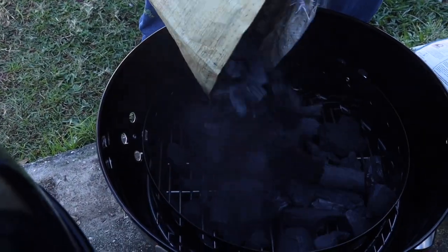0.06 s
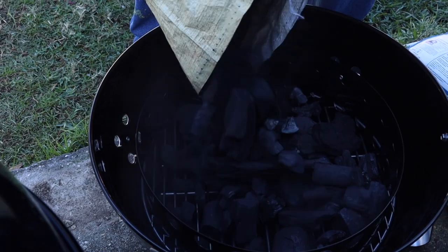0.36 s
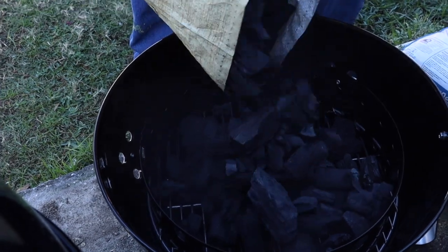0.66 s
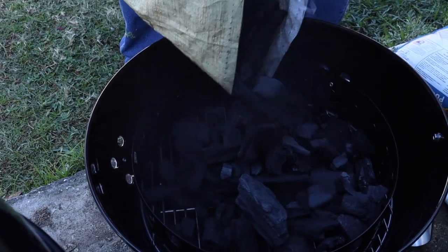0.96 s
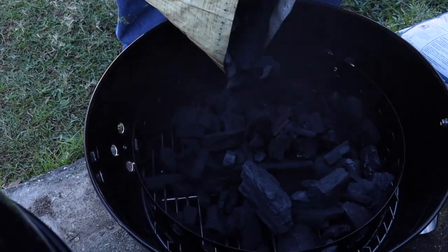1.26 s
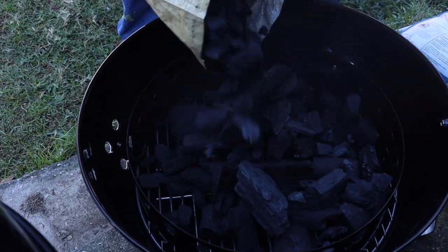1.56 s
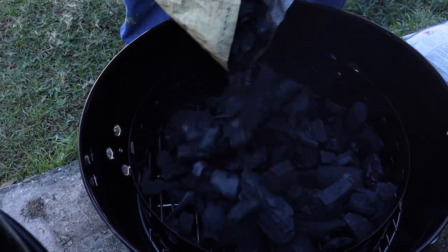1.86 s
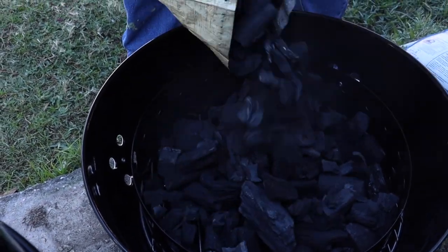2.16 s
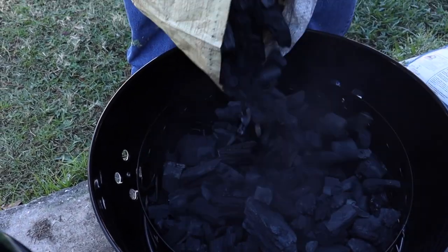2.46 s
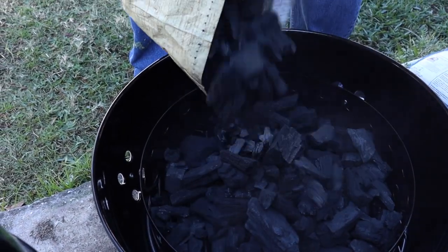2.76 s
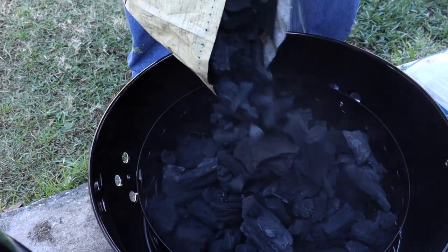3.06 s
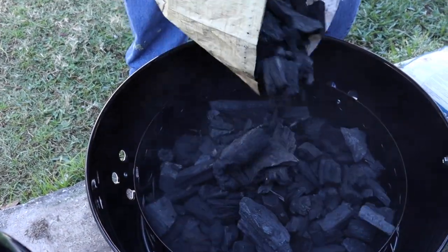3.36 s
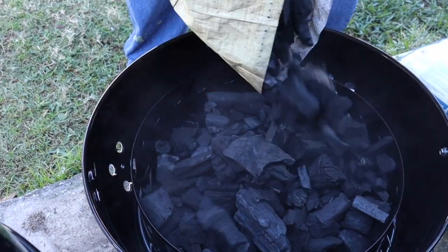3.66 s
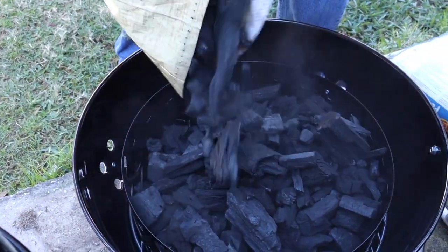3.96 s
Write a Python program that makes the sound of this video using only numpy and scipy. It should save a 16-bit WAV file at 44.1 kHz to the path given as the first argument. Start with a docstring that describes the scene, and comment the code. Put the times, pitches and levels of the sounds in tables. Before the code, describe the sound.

Lump charcoal pours from a paper bag into a metal grill, clinking and clattering.

```python
"""Lump charcoal, shaken from a paper bag into a steel smoker bowl, outdoors.
Big lumps ring in a few modes and bounce; smaller ones clatter in clusters.
Splinters snap, grit tinkles, hard contacts crack. The bowl adds short echoes and a metallic ring.
The bag crumples and thumps as the load shifts, over faint open-air noise."""
import sys
import numpy as np
from scipy import signal
from scipy.fft import rfft, irfft, next_fast_len
from scipy.io import wavfile
from scipy.ndimage import uniform_filter1d, map_coordinates

SR = 44100
rng = np.random.default_rng(int(sys.argv[2]) if len(sys.argv) > 2 else 0)


def generate_wav(signal):
    """Clip the signal to [-1, 1] and save it as 16-bit WAV at the path in sys.argv[1]."""
    frames = np.transpose(np.atleast_2d(signal))
    scaled = np.clip(frames, -1, 1) * 32767
    pcm = np.round(scaled).astype(np.int16)
    wavfile.write(sys.argv[1], SR, pcm)


N = 4 * SR
CONTACT_S = 0.00029

# Lump landings: t/s, level/dB, f/Hz, T60/s
LANDINGS = [(0, -19, 2320, 0.065), (0.087, -35, 2460, 0.19), (0.109, -14.5, 3090, 0.023),
            (0.183, -29, 2406, 0.14), (0.294, -23, 1020, 0.035), (0.3316, -6, 3069, 0.061),
            (0.35, -16.5, 3810, 0.041), (0.4289, -1.5, 3127, 0.023), (0.4533, 2.5, 3040, 0.021),
            (0.477, -7.5, 3240, 0.017), (0.518, -22.5, 4560, 0.018), (1.2225, -11.5, 2404, 0.027),
            (1.23, -16.5, 2438, 0.079), (1.264, -15.5, 3070, 0.027), (1.303, -15, 3030, 0.02),
            (1.473, -20, 2530, 0.035), (1.485, -12.5, 2620, 0.027), (1.512, -20, 2375, 0.06),
            (1.559, -17, 2420, 0.033), (1.625, -18.5, 4060, 0.068), (1.6578, -18, 2893, 0.065),
            (1.663, -16.5, 3485, 0.034), (1.87, -16, 2990, 0.028), (1.9078, -18, 2477, 0.16),
            (2.182, -11.5, 3110, 0.037), (2.2468, 0, 2300, 0.0096), (2.257, -7.5, 3180, 0.03),
            (2.3238, -9.5, 3040, 0.029), (2.4733, -13, 2992, 0.047), (2.5225, -13, 3040, 0.033),
            (2.5895, -7, 2400, 0.033), (2.6359, -21, 3564, 0.37), (2.6727, -11, 2465, 0.036),
            (2.7048, -8.5, 2990, 0.023), (2.7375, -0.5, 3080, 0.013), (2.7447, -2, 3264, 0.014),
            (2.8944, -23.5, 5350, 0.022), (2.918, -2.5, 3062, 0.025), (3.02, -16, 3110, 0.075),
            (3.0465, -10, 2380, 0.043), (3.1147, -18, 2230, 0.017), (3.143, -5, 3000, 0.023),
            (3.5282, -19, 2440, 0.055), (3.719, -17.5, 2545, 0.037), (3.765, -22, 2500, 0.041),
            (3.8046, -12, 2850, 0.015), (3.8764, -18, 3200, 0.036)]
# Lump modes: frequency ratio, level/dB
LUMP_MODES = [(1, 3.5), (1.09, -7), (1.2, -15), (1.62, -28), (3.55, -32.5)]


def clinks(level_db=1.12, attack_s=0.0015, detune=0.04, contacts=6, bounce_s=0.0083, loss_db=12):
    """Big lumps ring on landing and skitter on in ever weaker bounces."""
    out, t = np.zeros(N), np.arange(SR // 10) / SR
    attack = 1 - np.exp(-(t / attack_s) ** 2)
    for start_s, db, hz, t60_s in LANDINGS:
        for bounce, jitter in enumerate(rng.standard_normal((contacts, len(LUMP_MODES) + 1))):
            ring = np.zeros(len(t))
            for mode, (ratio, mode_db) in enumerate(LUMP_MODES):
                tuning = 1 + detune * jitter[mode] if mode or bounce else 1
                ring += amp(mode_db - 60 * t / t60_s) * np.sin(2 * np.pi * hz * ratio * tuning * t)
            delay_s = bounce_s * bounce * np.exp(0.22 * jitter[-1])
            gain = amp(db + level_db - loss_db * np.sqrt(bounce))
            add(out, start_s + delay_s, gain * ring * attack)
    return out


# Clusters rolling down the heap: centre t/s, level/dB, half-width/s
CLUSTERS = [(.1, -36, 0.24), (.935, -29.5, 0.017), (1.338, -19.5, 0.0099), (1.52, -25, 0.054),
            (1.605, -27, 0.025), (1.7, -30, 0.065), (1.88, -18.5, 0.023), (1.925, -16.5, 0.029),
            (1.975, -17.5, 0.0084), (2.075, -27.5, 0.041), (2.164, -21, 0.021), (2.21, -21, 0.074),
            (2.28, -35, 0.015), (2.41, -28.5, 0.046), (2.51, -27.5, 0.084), (2.61, -18, 0.017),
            (2.662, -10.5, 0.019), (3.06, -26, 0.039), (3.16, -16.5, 0.023), (3.225, -20, .016),
            (3.28, -29, 0.045), (3.425, -27, 0.024), (3.54, -21, 0.013), (3.73, -27, 0.052),
            (3.795, -27.5, 0.017), (3.91, -32, 0.055)]


def tumbles(level_db=-3.5, crunch_db=-11, scrape_db=-43.5):
    """Mid-size lumps clatter and crunch together in clusters, over a soft steady scrape."""
    clatter = pieces(band_hz=(1950, 4200), t60_s=0.028, scatter_db=3.5, count=3000, centring=2)
    crunch = pieces(band_hz=(3400, 6800), t60_s=0.018, scatter_db=4, count=3000)
    scrape = pieces(band_hz=(1700, 4600), t60_s=0.01, scatter_db=1.5, count=6000, centring=2)
    rolling = even(unit(clatter) + amp(crunch_db) * unit(crunch), span_s=0.12)
    return amp(level_db) * rolling * surges(CLUSTERS, floor_db=-45.5) + amp(scrape_db) * unit(scrape)


# Chip sprays: centre t/s, level/dB, half-width/s
CHIP_SPRAYS = [(.73, -54, 0.011), (1.105, -41.5, 0.01), (1.335, -44.5, 0.0077), (1.52, -47.5, 0.05),
               (1.615, -39, 0.014), (1.675, -37.5, 0.026), (1.915, -34.5, 0.022), (2.08, -42, 0.01),
               (2.175, -44, 0.047), (2.26, -45.5, 0.024), (2.43, -41, 0.053), (2.485, -38, 0.02),
               (2.57, -39.5, 0.046), (2.662, -32.5, 0.029), (3.145, -38, 0.015), (3.225, -36, 0.013),
               (3.27, -32.5, 0.0091), (3.535, -34.5, 0.013), (3.722, -38, 0.019), (3.8, -42.5, 0.025)]
# Grit spectrum: f/Hz, level/dB
GRIT_SPECTRUM = [(3000, 12), (7000, 3.5), (13000, -3), (16000, -19)]


def chips(splinter_db=0.5, grit_db=-3, clump_db=3.5):
    """Splinters ring glassily in each spray; dry grit tinkles on in clumps between sprays."""
    grit = pieces(band_hz=(3000, 16000), t60_s=0.007, scatter_db=4.5, count=2500, modes=3)
    grit = even(colour(grit, GRIT_SPECTRUM), span_s=0.05) * surges(CHIP_SPRAYS, floor_db=-48.5)
    splinters = pieces(band_hz=(5000, 14500), t60_s=0.024, scatter_db=4.2, count=1700, modes=4)
    splinters = even(splinters, span_s=0.04) * surges(CHIP_SPRAYS, floor_db=-64)
    clumps = amp(clump_db * wobble(knots_per_s=35.3))
    return amp(splinter_db) * splinters + amp(grit_db) * clumps * grit


# Splinter breaks: t/s, level/dB, centre f/Hz
BREAKS = [(0.426, -24.5, 10040), (.676, -41, 13900), (0.902, -36, 11300), (1.827, -22, 11700),
          (2.318, -28, 9500), (2.427, -19.5, 11500), (2.519, -19, 11000), (2.542, -20, 10800),
          (2.65, -17, 10500), (2.675, -23, 10500), (2.737, -16.5, 9500), (3.021, -25, 9800),
          (3.208, -20.5, 11500), (3.524, -22, 7800)]


def snaps(level_db=-10, t60_s=0.017, pitch_spread=0.32, scatter_s=0.013, fragments=14):
    """Brittle splinters shatter; fragments ring briefly at high, unrelated pitches."""
    out, t = np.zeros(N), np.arange(SR // 16) / SR
    attack = 1 - np.exp(-t / CONTACT_S)
    for start_s, db, centre_hz in BREAKS:
        envelope = attack * amp(db + level_db - 60 * t / t60_s)
        for pitch, lag, strength in rng.random((fragments, 3)):
            hz = centre_hz * np.exp(pitch_spread * (2 * pitch - 1))
            add(out, start_s + scatter_s * lag, (0.5 + strength) * envelope * np.sin(2 * np.pi * hz * t))
    return out


# Hard contacts: t/s, peak level/dB
HARD_CONTACTS = [(0.236, -21.5), (.666, -37), (1.096, -25.5), (1.1838, -18.5), (1.2062, -7), (1.598, -7),
                 (1.626, -7.5), (2.1533, -5.5), (2.189, -10), (2.2482, -12)]
# Crack spectrum: f/Hz, level/dB
CRACK_SPECTRUM = [(100, -13), (500, -0.5), (1600, 2), (4500, -3), (8000, -17), (15000, -35)]


def cracks(t60_s=0.043):
    """Hard contacts give dry, unpitched noise bursts."""
    out, t = np.zeros(N), np.arange(SR // 20) / SR
    for start_s, db in HARD_CONTACTS:
        burst = colour(rng.standard_normal(len(t)) * amp(-60 * t / t60_s), CRACK_SPECTRUM)
        add(out, start_s, amp(db) * burst / np.abs(burst).max())
    return out


# Bowl modes: f/Hz, level/dB
BOWL_MODES = [(2350, 5.5), (2473, 4.5), (2663, -26), (2835, -14), (3085, -2.5), (3490, 13)]
# Wall echo spectrum: f/Hz, level/dB
ECHO_SPECTRUM = [(5000, 1), (14000, -5.5)]


def bowl(coal, echo_db=-9, echo_t60_s=0.24, echo_rise_s=0.0009, ring_db=-24, ring_t60_s=0.34):
    """Steel walls add dense short echoes and ringing modes to the direct sound."""
    t = np.arange(SR // 2) / SR
    echo = colour(rng.standard_normal(len(t)), ECHO_SPECTRUM)
    echo *= amp(-60 * t / echo_t60_s) * (1 - np.exp(-t / echo_rise_s))
    ring = sum(amp(db) * np.sin(2 * np.pi * (hz * t + rng.random())) for hz, db in BOWL_MODES)
    ring *= amp(-60 * t / ring_t60_s)
    response = amp(echo_db) * echo / np.linalg.norm(echo) + amp(ring_db) * ring / np.linalg.norm(ring)
    return coal + signal.fftconvolve(coal, response)[:N]


# Bag crumples: centre t/s, level/dB, half-width/s
BAG_CRUMPLES = [(.2, -37, 0.023), (.365, -30, 0.043), (.42, -27.5, 0.016), (1.24, -32, 0.037),
                (1.31, -27, 0.011), (1.345, -35, 0.03), (1.58, -25.5, 0.033), (1.63, -30, 0.029),
                (1.73, -30.5, 0.022), (1.91, -27.5, 0.037), (2.08, -25, 0.021), (2.168, -23, 0.039),
                (2.315, -32, 0.036), (2.39, -23, 0.012), (2.46, -32.5, 0.099), (2.615, -25.5, 0.021),
                (2.985, -35, 0.025), (3.062, -28, 0.022), (3.283, -28, 0.021), (3.535, -32.5, 0.072),
                (3.71, -33.5, 0.066), (3.82, -33, 0.032), (3.915, -32, 0.055)]
# Paper spectrum: f/Hz, level/dB
PAPER_SPECTRUM = [(40, -65), (110, -2), (200, 2), (450, 6.5), (850, 3), (1300, 2), (1900, 6), (3000, -1.5),
                  (5000, -9.5), (8000, -24.5), (15000, -25.5)]


def bag(level_db=2, knock_db=-2):
    """Paper creases densely while lumps knock inside."""
    creases = colour(taps(scatter_db=3.2, count=10000), PAPER_SPECTRUM)
    knocks = pieces(band_hz=(640, 2000), t60_s=0.026, scatter_db=4.5, count=1100)
    crumple = even(unit(creases) + amp(knock_db) * unit(knocks), span_s=0.028)
    return amp(level_db) * crumple * surges(BAG_CRUMPLES, floor_db=-42)


# Load shifts: centre t/s, level/dB, half-width/s
LOAD_SHIFTS = [(.4, -38.5, 0.049), (.57, -32.5, 0.024), (.7, -34.5, 0.0065), (1.03, -36, 0.087),
               (1.33, -29, 0.028), (1.56, -28.5, 0.058), (1.73, -36, 0.066), (1.91, -37.5, 0.066),
               (2.18, -22, 0.042), (2.397, -24, 0.027), (2.615, -32.5, 0.049), (3.7, -32.5, 0.054),
               (3.85, -28.5, 0.075)]
# Thump spectrum: f/Hz, level/dB
THUMP_SPECTRUM = [(40, -20), (110, -14), (185, -1), (340, -0.5), (1200, -29), (5000, -103)]


def thumps(level_db=-1, hollow_db=-2):
    """The whole load shifts in the bag with dull, hollow thumps."""
    hollow = pieces(band_hz=(145, 330), t60_s=0.11, scatter_db=2, count=250, centring=2)
    hollow = colour(hollow, THUMP_SPECTRUM)
    thuds = colour(taps(scatter_db=1, count=900), THUMP_SPECTRUM)
    load = even(unit(thuds) + amp(hollow_db) * unit(hollow), span_s=0.073)
    return amp(level_db) * load * surges(LOAD_SHIFTS, floor_db=-46)


# Outdoor background spectrum: f/Hz, level/dB
AIR_SPECTRUM = [(25, -20.5), (150, 9), (500, 7), (2500, -10), (15000, -52)]


def air(level_db=-44.5):
    """Faint, steady, low outdoor noise."""
    return amp(level_db) * unit(colour(rng.standard_normal(N), AIR_SPECTRUM))


def pieces(band_hz, t60_s, scatter_db, count, centring=1, modes=1):
    """Randomly timed pieces ring as damped sines; more centring gathers pitches mid-band."""
    draws = rng.random((count * modes, 3 + centring))
    life, strength, polarity, pitch = np.split(draws, [1, 2, 3], axis=1)
    t = np.arange(int(t60_s * SR)) / SR
    low_hz, high_hz = band_hz
    hz = low_hz * (high_hz / low_hz) ** pitch.mean(axis=1, keepdims=True)
    gain = amp(-scatter_db * np.log(1 - 0.98 * strength)) * np.sign(polarity - 0.5)
    decay = amp(-60 * t / (t60_s * (0.5 + life)))
    attack = 1 - np.exp(-(t / CONTACT_S) ** 2)
    rings = gain * np.sin(2 * np.pi * hz * t) * decay * attack
    starts = np.repeat(rng.integers(N, size=count), modes)
    indices = starts[:, None] + np.arange(len(t))
    return np.bincount(indices.ravel(), rings.ravel(), N)[:N]


def taps(scatter_db, count):
    """Random impulses of uneven size."""
    indices = (rng.random(count) * N).astype(int)
    polarity, strength = rng.standard_normal((count, 2)).T
    return np.bincount(indices, np.sign(polarity) * amp(scatter_db * strength), N)


def surges(rows, floor_db, rise_scale=0.8, fall_scale=0.83):
    """Gain curve: Gaussian power swells over a steady floor."""
    t = np.arange(N) / SR
    coarse_t = t[::SR // 2000]
    power = amp(floor_db) ** 2
    for centre_s, db, half_s in rows:
        width_s = half_s * np.where(coarse_t < centre_s, rise_scale, fall_scale)
        power = power + amp(db) ** 2 * np.exp(-((coarse_t - centre_s) / width_s) ** 2)
    return np.interp(t, coarse_t, np.sqrt(power))


def even(x, span_s):
    """Level to about rms 1 over span_s; faster detail stays."""
    size = max(3, int(span_s * SR))
    power = uniform_filter1d(uniform_filter1d(x ** 2, size), size)
    return x / np.sqrt(np.abs(power) + 0.02 * np.mean(x ** 2))


def colour(x, spectrum):
    """Minimum-phase filter through (f/Hz, level/dB) points."""
    size = 2 * next_fast_len(len(x) // 2 + SR // 8)
    hz, db = np.transpose(spectrum)
    curve_db = np.interp(np.log(np.fft.rfftfreq(size, 1 / SR) + 1), np.log(hz), db)
    cepstrum = irfft(np.log(amp(curve_db)))
    cepstrum[1:size // 2] *= 2
    cepstrum[size // 2 + 1:] = 0
    return irfft(rfft(x, size) * np.exp(rfft(cepstrum)))[:len(x)]


def wobble(knots_per_s):
    """Smooth random curve."""
    return map_coordinates(rng.standard_normal(N // 100), [np.arange(N) * knots_per_s / SR])


def amp(db):
    """Decibels to gain."""
    return 10 ** (np.asarray(db) / 20)


def unit(x):
    """Scale to rms 1."""
    return x / np.sqrt(np.mean(x ** 2) + 1e-20)


def add(out, start_s, x):
    """Mix x into out at start_s."""
    i = max(0, round(start_s * SR))
    out[i:i + len(x)] += x[:max(0, len(out) - i)]


def scene():
    """Charcoal in the bowl, the bag above it, open air; mono."""
    coal = clinks() + tumbles() + chips() + snaps() + cracks()
    background = air()
    return (bowl(coal) + bag() + thumps() + background)[None]


def record(dry, low_hz=40, top_hz=15900):
    """Microphone: deep-bass roll-off, hard upper band limit."""
    size = next_fast_len(N + SR // 2)
    hz = np.fft.rfftfreq(size, 1 / SR)
    response = (hz / np.hypot(hz, low_hz)) ** 2 * (hz < top_hz)
    return irfft(rfft(dry, size) * response, size)[:, :N]


dry = scene()
out = record(dry)
generate_wav(out)
```